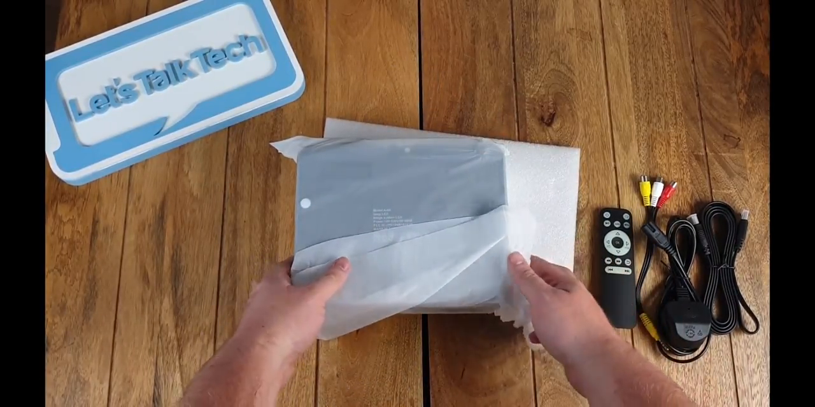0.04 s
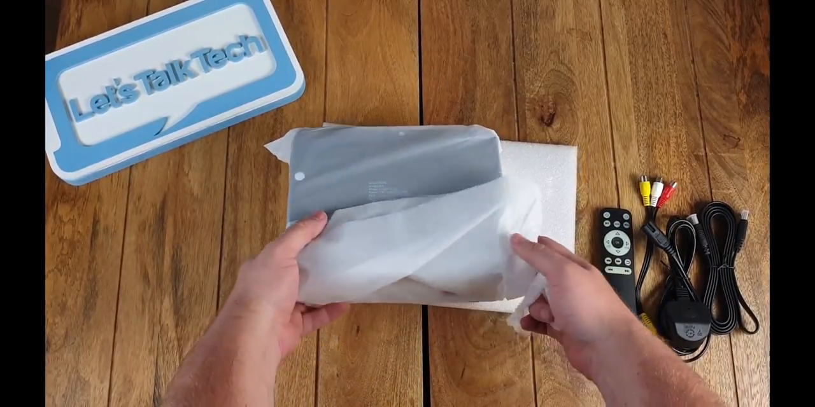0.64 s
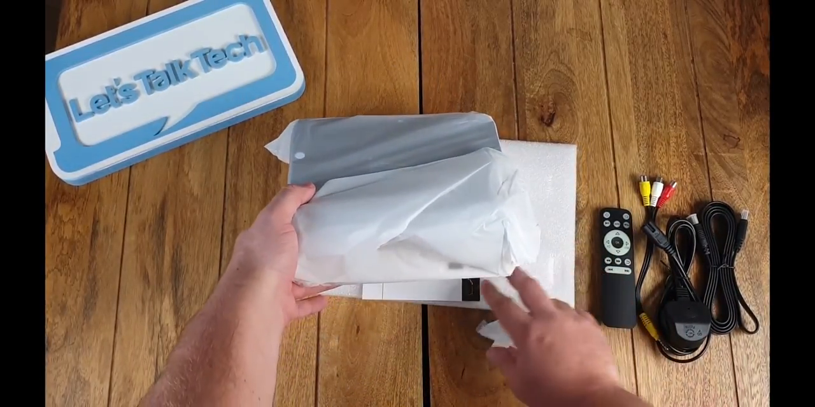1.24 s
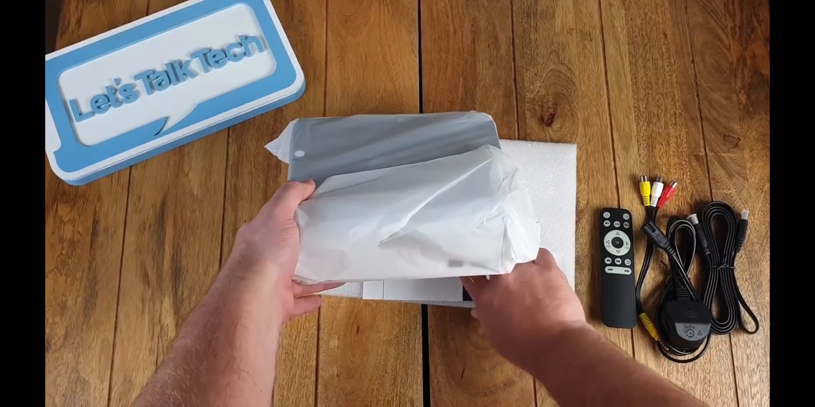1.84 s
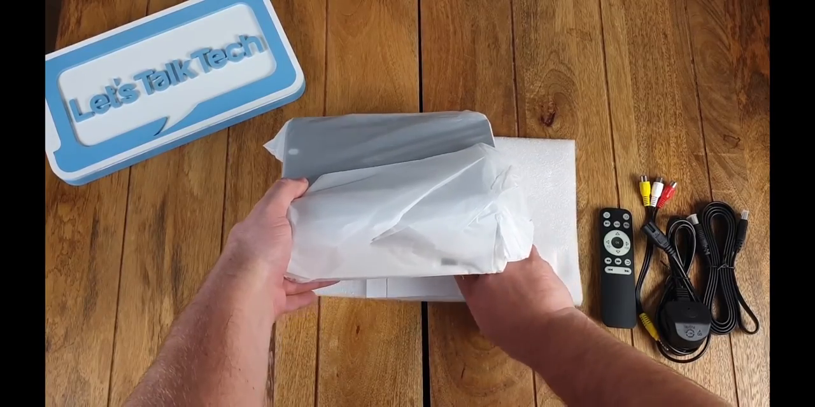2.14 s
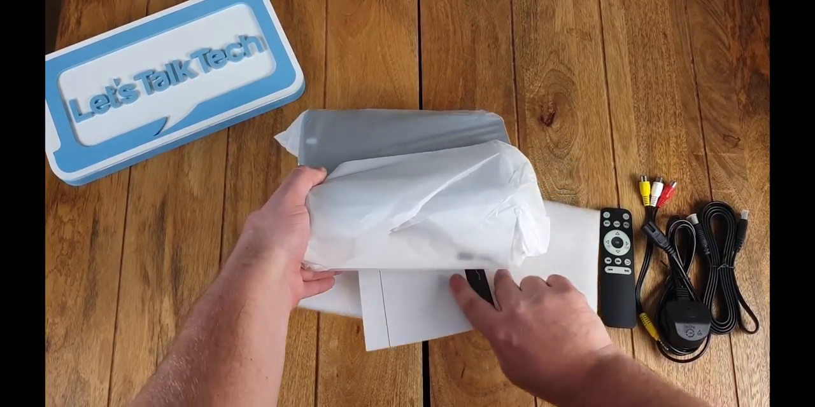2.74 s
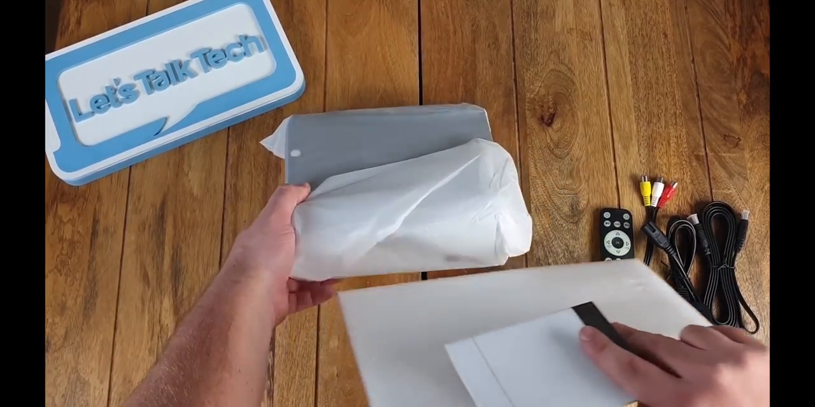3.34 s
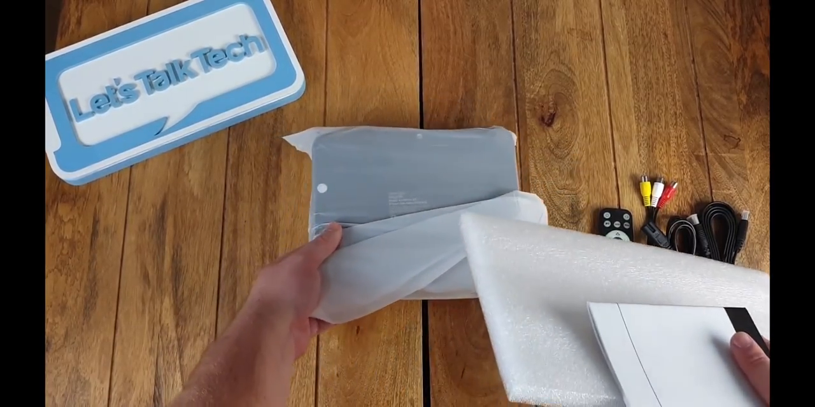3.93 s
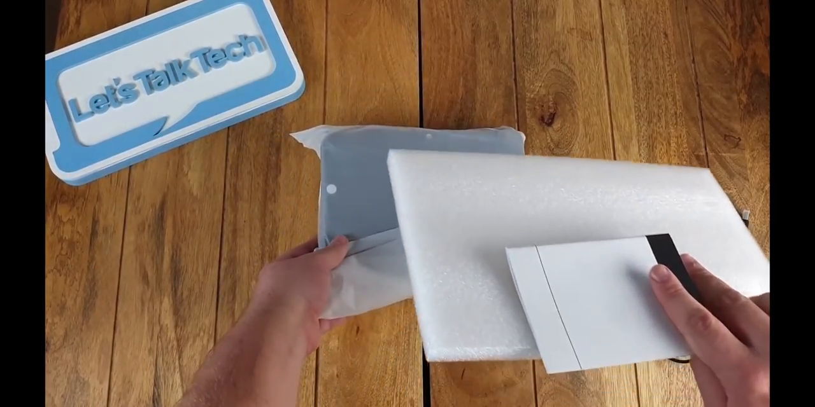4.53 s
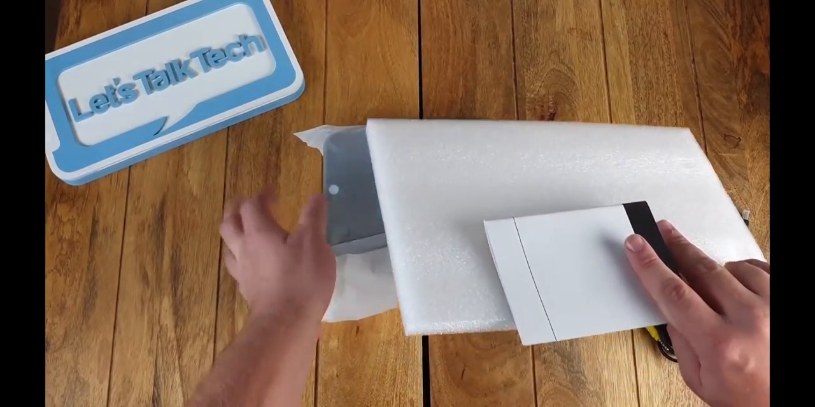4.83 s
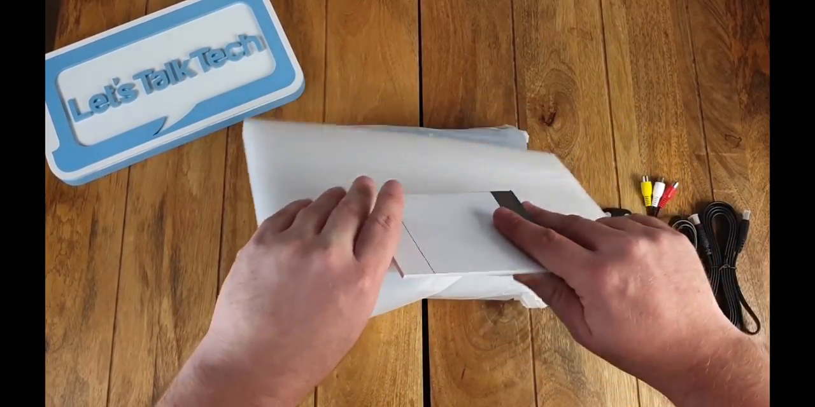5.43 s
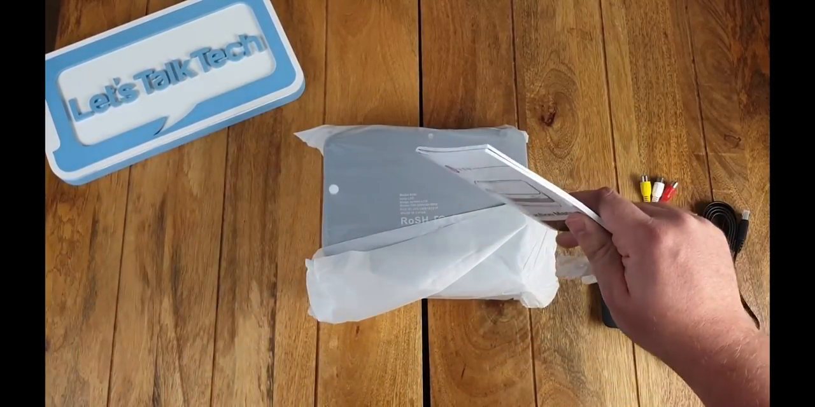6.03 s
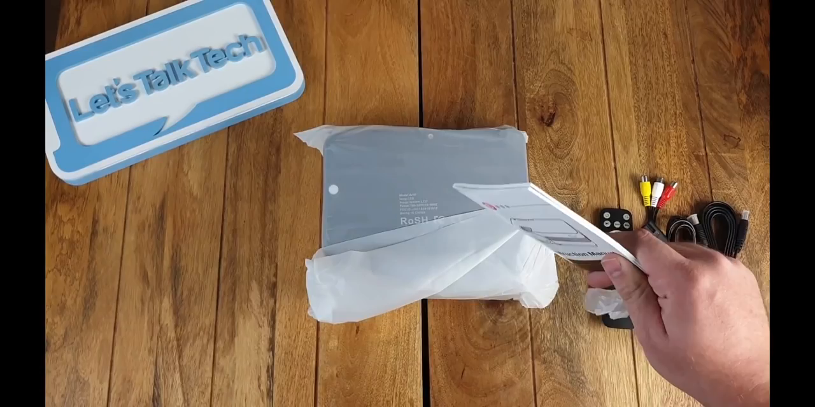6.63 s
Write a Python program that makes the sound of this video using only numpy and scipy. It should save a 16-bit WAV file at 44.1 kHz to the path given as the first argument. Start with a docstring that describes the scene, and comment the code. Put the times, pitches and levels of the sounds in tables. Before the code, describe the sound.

Plastic wrap crackles and a foam sheet slides out with a fizzy rustle, while a device knocks twice on a wooden table.

```python
"""A foam sheet slides out from under a plastic-wrapped device, pulled by two hands on a wooden table.
Foam cells catch and let go as a fizz, the wrap crackles and its creases snap. The device knocks twice,
ringing the table top and its own casing. Soft bumps of the hands and a faint electrical hum lie
underneath. Heard in a small room, from a close pair of microphones."""
import sys
import numpy as np
from scipy import signal
from scipy.fft import rfft, irfft
from scipy.io import wavfile
from scipy.ndimage import uniform_filter1d

SR = 44100
rng = np.random.default_rng(int(sys.argv[2]) if len(sys.argv) > 2 else 0)


def wrap_up_sound(samples):
    """Save the sound to the file named by the first command line argument, as 16-bit audio."""
    columns = np.atleast_2d(samples).T
    # keep every value between -1 and 1, then stretch to whole-number steps
    tamed = np.clip(columns, -1, 1)
    steps = np.round(tamed * 32767).astype(np.int16)
    wavfile.write(sys.argv[1], SR, steps)


N = 294305
TIME = np.arange(N) / SR
GRID = np.fft.rfftfreq(4096, 1 / SR)  # frequencies of the filter curves, Hz
EDGE_HZ = 15900  # top of the recorder's band


def gain_of(db):
    """Decibels to amplitude."""
    return 10 ** (np.asarray(db) / 20)


def unit_rms(x):
    """Scales to rms 1."""
    return x / np.sqrt(np.mean(x ** 2) + 1e-20)


def curve(points, hz=GRID):
    """Interpolates a table on a log-frequency axis."""
    points_hz, values = np.transpose(points)
    return np.interp(np.log(hz + 1), np.log(points_hz), values)


def octaves(hz, centre_hz):
    """Distance from a centre in octaves, held flat in the bass."""
    return np.log2(np.maximum(hz, 300) / centre_hz)


def add(track, start_s, sound):
    """Lays a sound into a track."""
    part = track[..., round(start_s * SR):][..., :sound.shape[-1]]
    part += sound[..., :part.shape[-1]]


def coloured(x, curve_db):
    """Minimum-phase filter with the given gain on GRID, for each row of x."""
    log_gain = np.log(gain_of(np.r_[curve_db, curve_db[-2:0:-1]]))
    kernel = np.fft.ifft(np.exp(np.conj(signal.hilbert(log_gain)))).real
    return signal.oaconvolve(x, kernel[None, :len(GRID)], axes=1)[:, :x.shape[1]]


def burst(length_s, curve_db, contact, steepness):
    """One contact and the tiny slips that follow it, left and right, with a set energy in the mid."""
    t = TIME[:SR // 4]
    fade = np.exp(-(t / max(length_s, 1e-4)) ** steepness)
    slips = rng.standard_normal((2, len(t))) * fade
    # many unrelated slips excite all pitches about equally
    for _ in range(2):
        flat_spectrum = np.exp(1j * np.angle(rfft(slips)))
        slips = irfft(flat_spectrum, len(t)) * np.sqrt(fade)
    slips /= np.linalg.norm(slips[0])
    slips[0, 0] += contact
    mid, side = coloured(slips, curve_db)
    return np.array([mid + side, mid - side]) / np.linalg.norm(mid) * np.sqrt(SR / 400)


def room(pair, wet_db, build_s=0.0018):
    """Direct sound and the diffuse tail of a small room, which builds up as the walls answer."""
    # decay of the room: frequency_hz, t60_s
    room_t60 = [(100, 0.45), (300, 0.34), (1000, 0.33), (3000, 0.31), (7000, 0.28), (14000, 0.2)]
    count = SR // 2
    hz, t, noise = signal.stft(rng.standard_normal((2, count)), SR, nperseg=256)
    decay = gain_of(-60 * t / curve(room_t60, hz)[:, None])
    tail = signal.istft(noise * decay, SR, nperseg=256)[1][:, :count]
    tail *= np.minimum(TIME[:count] / build_s, 1)
    echo = signal.fftconvolve(pair, tail / np.linalg.norm(tail[0]), axes=1)[:, :N]
    return (pair + gain_of(wet_db) * echo) / np.hypot(1, gain_of(wet_db))


def room_tone(level_db=-62.5):
    """Distant, steady noise that reaches both microphones much alike."""
    # spectrum of the room's noise: frequency_hz, gain_db
    colour = [(20, 4.5), (60, 1), (140, -2.5), (270, 3), (420, -5), (800, -8), (1200, -15), (1600, -14),
              (2000, -14), (2600, -19.5), (5000, -22.5), (7300, -21), (9000, -24.5), (15500, -24)]
    # its stereo width: frequency_hz, side_minus_mid_db
    width = [(30, -20), (100, -15), (250, -13.5), (450, -5), (750, -6), (1100, -9), (2000, -7), (3500, -10),
             (4400, -5), (5600, -9), (7300, -0.5), (8700, -12), (12000, -7), (15000, -11)]
    mid, side = gain_of(level_db) * unit_rms(coloured(rng.standard_normal((2, N)), curve(colour)))
    side = coloured(side[None], curve(width))[0]
    return np.array([mid + side, mid - side])


def electrical_hum(waver_db=0.9, drift_rad=0.62):
    """Faint steady tones, each wavering slowly in level and phase."""
    # tones of the hum: pitch_hz, level_db, side_minus_mid_db
    tones = [(100.6, -65.5, -15), (208, -69, -25), (297.3, -67.5, -18), (391, -86, 11.5), (737, -81.5, -6),
             (1965, -83.5, -4)]
    # their common rise and fall: time_s, gain_db
    swell = [(0, 4), (1.4, 2), (2.6, 3), (3.5, -1), (4.3, 1.5), (5.5, -4), (5.9, -0.5), (6.6, 2.5)]
    swell_db = np.interp(TIME, *np.transpose(swell))
    knots = np.linspace(0, TIME[-1], num=50)
    mid, side = np.zeros((2, N))
    for hz, db, side_db in tones:
        waver, drift = (np.interp(TIME, knots, rng.standard_normal(len(knots))) for _ in range(2))
        level = gain_of(db + swell_db + waver_db * waver)
        phase = 2 * np.pi * hz * TIME + drift_rad * drift
        mid += level * np.sin(phase)
        side += level * gain_of(side_db) * np.cos(phase)
    return np.array([mid + side, mid - side])


def hand_bumps():
    """Padded contacts of hands and foam that stir only the bass of the table."""
    # soft contacts: start_s, level_db, length_s
    bumps = [(0.468, -43.5, 0.063), (1.412, -59, .05), (1.718, -51.5, 0.053), (2.092, -44, 0.076),
             (2.248, -56, 0.065), (3.179, -33.5, 0.034), (3.931, -36.5, 0.041), (4.027, -42.5, 0.039),
             (4.286, -49, 0.024), (4.698, -25, 0.0052), (5.321, -55, 0.026), (5.867, -57, 0.17),
             (6.546, -55, 0.17)]
    # the table's dull answer: frequency_hz, gain_db
    colour = [(30, -13), (65, 7), (130, 5), (200, 5), (340, -3), (480, -19.5), (1000, -24), (3000, -54),
              (12000, -87)]
    track = np.zeros((2, N))
    for start_s, db, length_s in bumps:
        add(track, start_s, gain_of(db) * burst(length_s, curve(colour), contact=0.34, steepness=2.2))
    return room(track, wet_db=-6)


def ring(modes, rise_s):
    """Dying modes, each a quarter turn behind the last; high ones reach the two sides out of step."""
    t = TIME[:SR]
    swing = np.zeros((2, SR))
    for k, (hz, db, t60) in enumerate(modes):
        apart = np.array([[1], [-1]]) * rng.choice([-1, 1]) * min(hz / 300, 1) * np.pi / 4
        swing -= gain_of(db - 60 * t / t60) * np.sin(2 * np.pi * hz * t - k * np.pi / 2 + apart)
    return swing * (1 - np.exp(-t / rise_s))


def device_knocks():
    """A heavy push on the wood, a clatter of the casing, and the ringing of both."""
    # the device meets the table: start_s, table_ring_db, casing_ring_db, thud_db, contact_s,
    # clatter_db, tilt_db_per_octave, clatter_s
    knocks = [(2.9045, -21, -40, -22, 0.00059, -17, -3, 0.01),
              (4.7049, -34.5, -31.5, -28, 0.0025, -15.5, -0.92, 0.012)]
    # modes of the wooden top: pitch_hz, level_db, t60_s
    table_modes = [(65.3, -11, 0.35), (85.5, -7.5, 0.42), (107.3, -10.5, 0.3), (139.4, -7.5, 0.36),
                   (163.3, 3.5, 0.31), (217, -25, 0.6), (244, -29.5, 0.91), (287.4, -12, 0.48),
                   (336.4, -8, 0.33), (434, -13, 0.28), (448, -11, 0.12), (502, -9, 0.2), (530, -16, 0.056),
                   (746, -13, 0.29)]
    # modes of the plastic casing: pitch_hz, level_db, t60_s
    casing_modes = [(192, -9, 0.37), (249.6, 0.5, 0.29), (295.5, 2.5, 0.32), (312, 5.5, 0.27),
                    (337, 4, 0.2), (483, -1.5, 0.24), (622, 3, 0.19), (695, -6, 0.23), (957, -20, 0.54),
                    (946, -8, 0.26), (1130, -8.5, 0.25), (1329, -3, 0.25), (1353, -3, 0.16),
                    (1399, -1.5, 0.19), (1476, -9, 0.32), (1496, -14.5, 0.47), (1720, -20, 0.27),
                    (1924, -7.5, 0.28), (2010, -14, 0.35), (2090, -32, .3), (2240, -38, .24)]
    # spectrum of the clatter: frequency_hz, gain_db
    colour = [(30, -11), (70, 5), (170, -0.5), (330, 9), (560, -3), (800, -1), (1050, -5), (1450, -2.5),
              (2200, -5.5), (3200, -12.5), (6800, -14.5), (8800, -26), (14500, -24.5)]
    body, clatter = np.zeros((2, 2, N))
    for start_s, table_db, casing_db, thud_db, contact_s, clatter_db, tilt, clatter_s in knocks:
        add(body, start_s, gain_of(table_db) * ring(table_modes, rise_s=0.0055))
        add(body, start_s, gain_of(casing_db) * ring(casing_modes, rise_s=0.0082))
        # the table top gives way and springs back; a longer contact pushes deeper bass
        age = TIME[:SR // 10] / contact_s
        add(body, start_s, -gain_of(thud_db) * age * (2 - age) * np.exp(1 - age))
        curve_db = curve(colour) + tilt * octaves(GRID, 1000)
        add(clatter, start_s, gain_of(clatter_db) * burst(clatter_s, curve_db, contact=.12, steepness=1))
    return body + room(clatter, wet_db=0.5)


def crease_snaps(ring_octaves=0.24):
    """A crease gives way in a short run of slips and rings the sheet around it; the smallest only tick."""
    # creases and finger taps: start_s, level_db, ring_hz, boost_db, tilt_db_per_octave, slip_s
    snaps = [(0.177, -43.5, 4000, 5, 6.5, .001), (0.328, -54, 4150, 9, 5.5, .022),
             (0.435, -46.5, 750, 4, -2.5, 0.042), (0.5647, -41, 1870, 5.5, 1.5, 0.014),
             (0.641, -42, 1850, 4.5, -2.5, 0.017), (0.8455, -38, 480, 7.5, -0.6, 0.014),
             (1.015, -46.5, 470, 13, -3, 0.0089), (1.0718, -39, 1250, 5.5, -2.5, .017),
             (1.945, -48.5, 798, 9, -7.5, 0.0039), (3.152, -49, 676, 8, -8.5, 0.0027),
             (3.448, -50.5, 2100, 16.5, 0.5, .005), (5.317, -51, 1230, 10, -6, .02)]
    # thin ticks of the stretched wrap: start_s, level_db
    ticks = [(1.968, -56), (2.027, -58), (3.177, -57.5), (3.581, -51), (3.802, -51.5), (4.145, -54.5),
             (4.208, -54), (4.393, -52.5), (4.659, -48)]
    # spectrum common to both: frequency_hz, gain_db
    colour = [(100, -41), (250, -9), (450, -6), (1000, -6), (2100, -2.5), (3500, -9), (7000, -7.5),
              (8800, -19), (15000, -20)]
    tick_shape = (9600, 5, 6.5, .006)  # ring_hz, boost_db, tilt_db_per_octave, slip_s
    events = snaps + [(*tick, *tick_shape) for tick in ticks]
    track = np.zeros((2, N))
    for start_s, db, ring_hz, boost_db, tilt, slip_s in events:
        away = octaves(GRID, ring_hz)
        curve_db = curve(colour) + tilt * away + boost_db * np.exp(-(away / ring_octaves) ** 2)
        add(track, start_s, gain_of(db) * burst(slip_s, curve_db, contact=.1, steepness=3))
    return room(track, wet_db=-2.5)


def foam_drags(width_octaves=0.31):
    """Foam dragged over card hums in a narrow band."""
    # moments when the sheet resounds: start_s, level_db, pitch_hz, length_s
    drags = [(5.52, -67.5, 710, 0.14), (2.72, -61, 840, 0.2)]
    track = np.zeros((2, N))
    for start_s, db, hz, length_s in drags:
        count = int(length_s * SR)
        band_db = np.maximum(-6 * (np.log2((GRID + 1) / hz) / width_octaves) ** 2, -50)
        band = coloured(rng.standard_normal((2, count)), band_db)
        add(track, start_s, gain_of(db) * unit_rms(band * signal.windows.tukey(count)))
    return room(track, wet_db=-20)


def grains(per_s, spread_db):
    """Clicks of uneven size, each from its own direction, so it reaches one side a little earlier."""
    count = int(per_s * N / SR)
    place, strength, direction, sign = rng.random((count, 4)).T
    size = gain_of(spread_db * np.minimum(-np.log(1 - strength), 5)) * np.sign(sign - .5)
    at = (place * N).astype(int)
    lag = np.round(16 * (direction - .5)).astype(int)  # samples
    return unit_rms(np.array([np.bincount(at, size, N), np.bincount((at + lag) % N, size, N)]))


def sliding(speed_exponent=0.61):
    """Level and treble tilt of the friction: one long pull, and strokes that speed up and slow down."""
    # the pull that draws the foam out: time_s, level_db, tilt_db_per_octave
    pull = [(1.95, -69, 3), (2.25, -60.5, -1), (2.47, -58, 0.4), (2.57, -50.5, -.1), (2.88, -47, -.2),
            (3.05, -52.5, 4), (3.13, -65, 3), (3.35, -84, -6)]
    # hands over wrap and foam: start_s, rise_s, fall_s, level_db, tilt_db_per_octave
    strokes = [(0.0, 0.02, 0.53, -65.5, 0), (0.176, 0.01, 0.085, -56.5, 1.5), (0.3, 0.029, 0.12, -60, -1.5),
               (0.41, 0.03, 0.069, -54.5, 1), (0.48, 0.044, 0.25, -59, 2.5),
               (0.705, 0.017, 0.046, -53, 4.5), (0.74, 0.07, 0.13, -56, 1.5), (0.998, .01, 0.033, -61.5, 7),
               (1.04, 0.078, 0.097, -60, 1), (1.5, 0.35, .35, -70.5, -1.5), (1.75, 0.014, 0.079, -58.5, -1),
               (2.11, 0.031, 0.059, -56, -2.5), (2.19, 0.059, 0.055, -51.5, -.5),
               (2.32, 0.071, 0.071, -56, 0), (3.22, 0.014, 0.066, -67.5, 1), (3.56, 0.12, 0.23, -64.5, 2.5),
               (3.845, 0.023, 0.16, -58, 2), (3.98, 0.13, 0.18, -63.5, 4), (4.299, 0.017, 0.081, -64, 0.5),
               (4.39, .12, 0.047, -59.5, 1.5), (4.55, 0.17, 0.15, -58.5, -.5),
               (4.675, 0.027, .03, -52.5, -2.5), (4.83, 0.013, 0.033, -55.5, 1.5),
               (5.29, .05, 0.23, -65, 0.5), (5.375, 0.052, 0.031, -51, .5), (5.515, 0.017, 0.1, -59.5, 0),
               (5.58, .09, 0.058, -56, 0.1), (5.8, 0.24, 0.085, -65, 2), (6.03, .022, 0.028, -58, 2)]
    pull_s, pull_db, pull_tilt = np.transpose(pull)
    power = gain_of(np.interp(TIME, pull_s, pull_db, left=-120, right=-120)) ** 2
    weighted_tilt = power * np.interp(TIME, pull_s, pull_tilt)
    for start_s, rise_s, fall_s, db, tilt in strokes:
        speed = np.interp(TIME, [start_s, start_s + rise_s, start_s + rise_s + fall_s], [0, 1, 0])
        stroke_power = (gain_of(db) * speed ** speed_exponent) ** 2
        power += stroke_power
        weighted_tilt += stroke_power * tilt
    return 10 * np.log10(power), weighted_tilt / power


def foam_rustle(crackle_share=0.38, patchy_db=1.86):
    """Foam cells catch and let go as a fine fizz; the wrap adds crackles, which a firm slide drowns."""
    # spectrum of the sliding: frequency_hz, gain_db
    colour = [(150, -6.5), (450, -3), (700, -6.5), (1200, -4.5), (2000, -1.5), (3000, 0.5), (4500, 1),
              (7200, 1), (8800, -4.5), (12000, -2.5), (15500, -8.5)]
    friction_db, tilt = sliding()
    looseness = crackle_share * np.clip((-47 - friction_db) / 12, .25, 1)
    fizz = grains(per_s=14000, spread_db=2.0)
    crackles = grains(per_s=320, spread_db=3.5)
    drive = (fizz + looseness * crackles) / np.hypot(1, looseness)
    hz, t, spectrum = signal.stft(drive, SR, nperseg=256, noverlap=192)
    tilt_db = octaves(np.maximum(hz, 900), 5000)[:, None] * np.interp(t, TIME, tilt)
    shape = gain_of(curve(colour, hz)[:, None] + tilt_db)
    # the treble keeps its power whatever the tilt
    treble = (hz > 2500) & (hz < EDGE_HZ)
    shape /= np.sqrt(np.mean(shape ** 2 * treble[:, None], axis=0))
    # the colour flickers in patches of about 1 kHz by 35 ms
    patches = uniform_filter1d(rng.standard_normal(shape.shape), size=6, axis=0)
    patches = unit_rms(uniform_filter1d(patches, size=24, axis=1))
    spectrum = spectrum * shape * gain_of(patchy_db * patches)
    rustle = signal.istft(spectrum, SR, nperseg=256, noverlap=192)[1][:, :N]
    return room(rustle * gain_of(friction_db), wet_db=-4.5)


def microphones(pair):
    """Two close microphones hear the treble differently and the bass alike."""
    # stereo width of the handling: frequency_hz, side_minus_mid_db
    width = [(30, -24), (70, -16), (170, -15.5), (350, -12), (700, -4), (1300, .5), (3000, .7), (15000, .2)]
    mid = (pair[:1] + pair[1:]) / np.sqrt(2)
    side = coloured((pair[:1] - pair[1:]) / np.sqrt(2), curve(width))
    return np.vstack([mid + side, mid - side])


def scene():
    """The handling on the table, close up, over room tone and hum."""
    handling = foam_rustle() + foam_drags() + crease_snaps() + device_knocks() + hand_bumps()
    return microphones(handling) + room_tone() + electrical_hum()


def record(dry, low_cut_hz=36):
    """The microphones lose the deepest bass, the recorder the highest treble."""
    low_cut = signal.butter(2, low_cut_hz, "highpass", fs=SR, output="sos")
    band_limit = signal.firwin(511, EDGE_HZ, window=("kaiser", 9), fs=SR)
    return signal.oaconvolve(signal.sosfilt(low_cut, dry), band_limit[None], "same")


dry = scene()
out = record(dry)
wrap_up_sound(out)
```